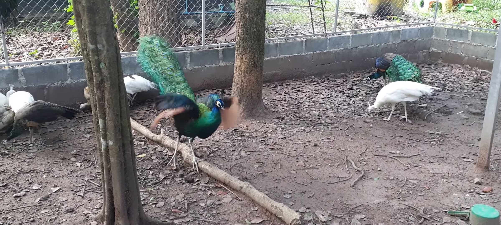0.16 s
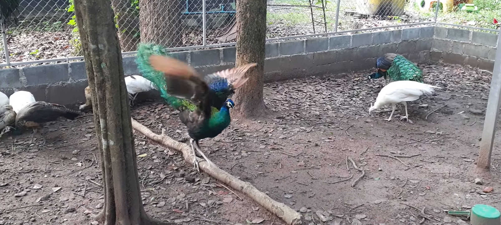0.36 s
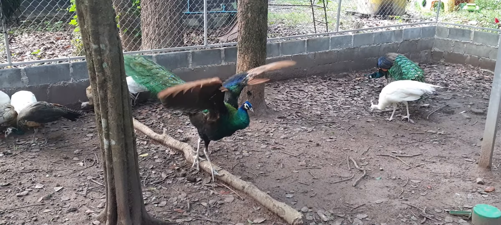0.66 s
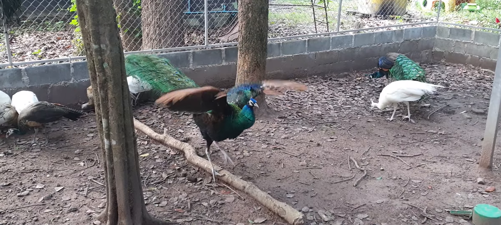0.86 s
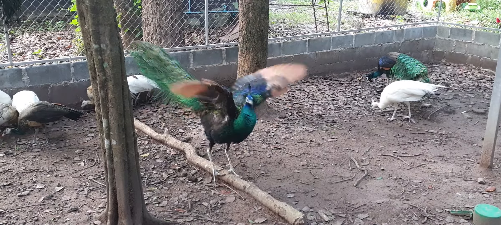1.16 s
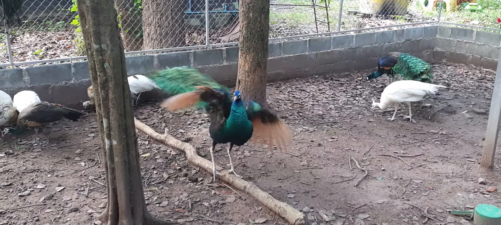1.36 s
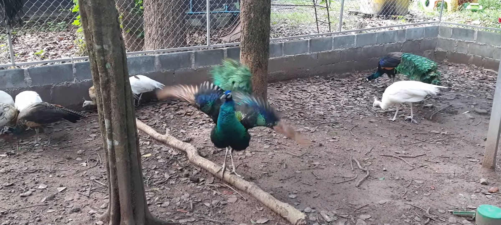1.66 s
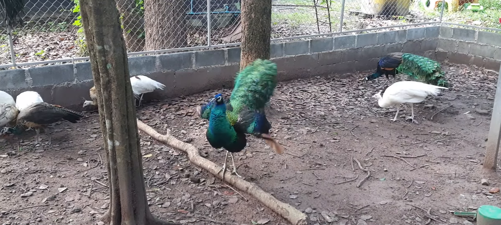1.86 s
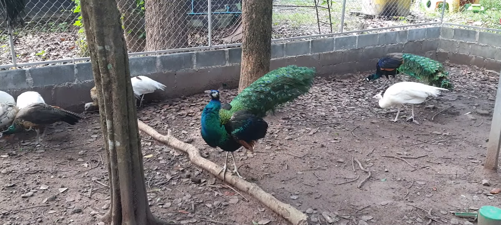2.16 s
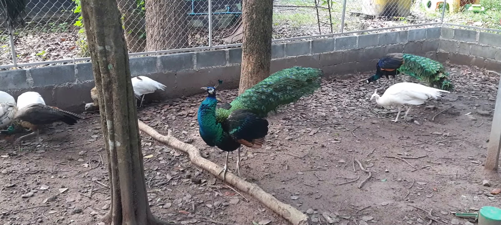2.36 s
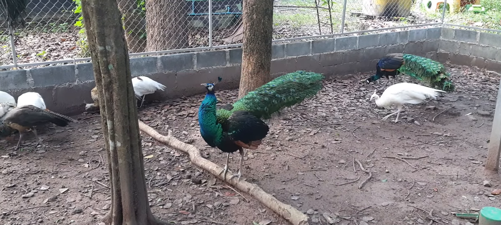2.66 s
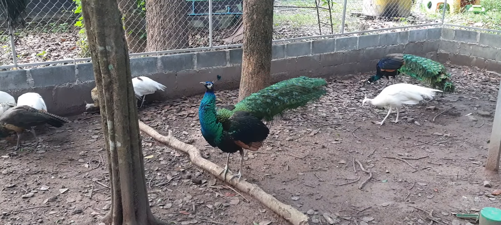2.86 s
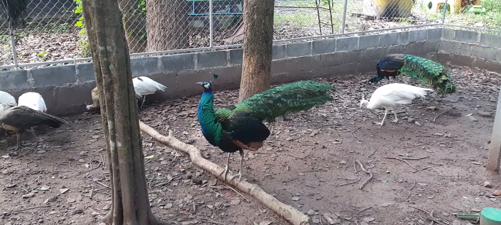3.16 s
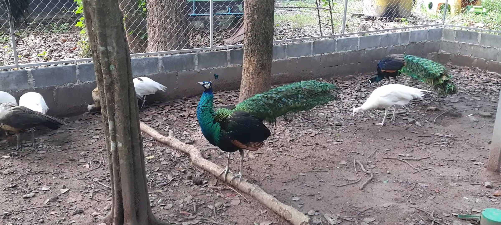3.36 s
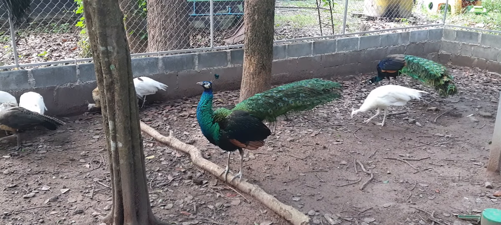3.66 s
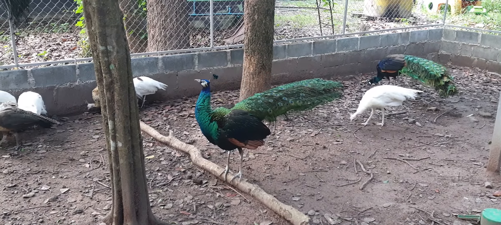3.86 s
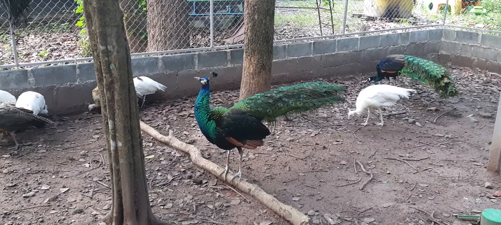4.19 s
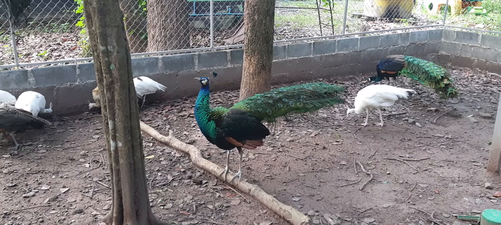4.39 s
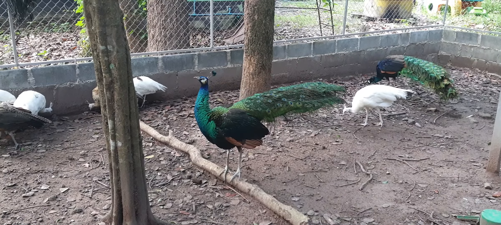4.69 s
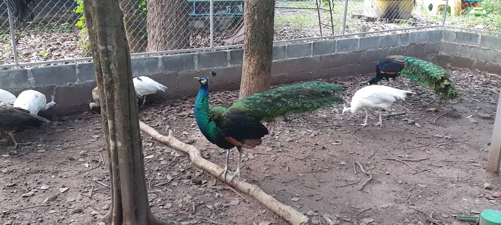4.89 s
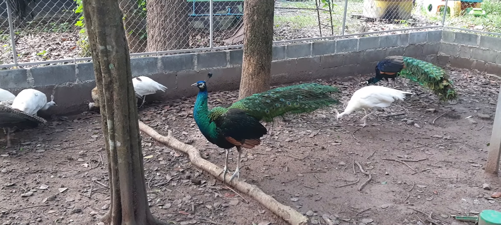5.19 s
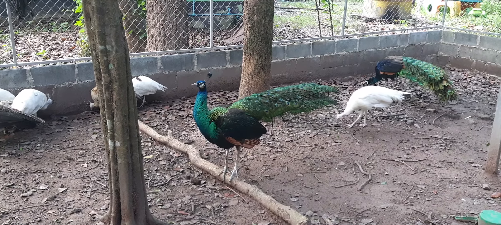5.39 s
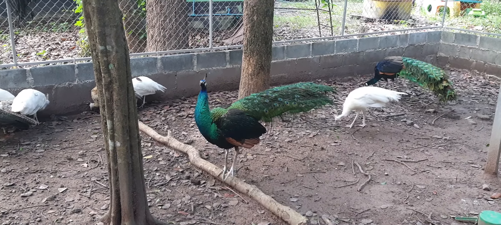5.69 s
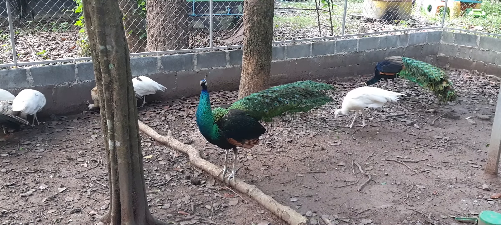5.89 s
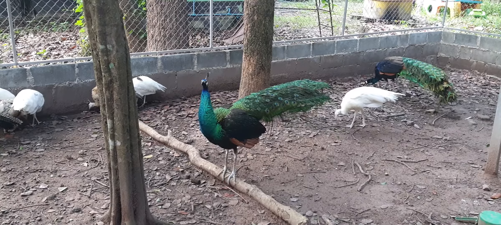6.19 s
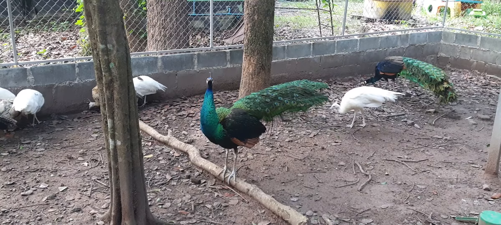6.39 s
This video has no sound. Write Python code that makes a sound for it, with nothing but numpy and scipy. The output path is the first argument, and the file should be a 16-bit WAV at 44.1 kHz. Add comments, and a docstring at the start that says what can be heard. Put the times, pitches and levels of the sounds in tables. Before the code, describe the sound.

An open-air walled pen with a short, scattered echo, heard in stereo with most birds to the right. A low engine drone near 80 Hz opens the scene with two wavering clucks; a tight cluster of sharp twig cracks comes at 0.15 s. Around 0.5 s a soft, low wing puff and dry feather rustle follow. The engine sags and stops abruptly at about 0.74 s, leaving a fainter, throbbing distant engine and traffic wash. A far, hoarse cock crow sinks from 0.8 to 2.5 s. Rustling continues until 1.9 s; a buzzy chirp comes at 1.4 s. Raspy small-bird calls recur near 0.3, 1.6, 2.8, 4.3 and 5.3 s, with clucks at 2.6-3.1 s and thin whistles at 1.1-1.7 and 3.6-5.3 s. Insects shrill steadily. Another buzzy chirp sounds at 5.2 s amid renewed rustling. At 5.8 s a peafowl calls loudly: one short rough syllable, then a longer, louder one from 6.16 s, turning hoarse until 6.6 s.

```python
"""A peacock flaps off a branch in a walled farm pen: twigs snap, feathers and dry leaves rustle. Two engines
drone far off; the nearer one soon stops short, then a far cock crows. Small birds chirp and whistle, fowl
cluck and insects shrill. At the end a peafowl gives a loud, hoarse call in two syllables.
Voices are pulses and breath through throat resonances, birds are trembling tones, engines are sines, and
snaps, rustle and air are filtered noise; the pen adds its echo to the nearby sounds."""
import sys
import numpy as np
from scipy import signal
from scipy.fft import rfft, irfft, next_fast_len
from scipy.io import wavfile

SR = 44100
rng = np.random.default_rng(int(sys.argv[2]) if len(sys.argv) > 2 else 0)


def unload_audio(sound):
    """Save the sound as a 16-bit wav file, at the path given as the first command line argument."""
    columns = np.transpose(np.atleast_2d(sound))
    # keep every value between -1 and 1, then stretch to whole-number steps
    steps = np.round(np.clip(columns, -1, 1) * 32767)
    wavfile.write(sys.argv[1], SR, steps.astype(np.int16))


N = 288414
TIME = np.arange(N) / SR  # seconds

# peafowl's throat in the short syllable, the long one and its hoarse end: [resonance_hz, width_hz, level_db]
THROAT_SHORT = [(638, 64, -7.5), (910, 55, -18.5), (1133, 114, -8), (1450, 265, -2.5), (1880, 110, -16),
                (2364, 150, -6.5), (2720, 340, -16.5), (3150, 160, -12.5), (4200, 230, -19),
                (5870, 1800, -25.5)]
THROAT_LONG = [(669, 30, 2), (800, 180, -7.5), (1070, 320, -7), (1470, 110, -16), (1655, 250, -0.5),
               (2064, 310, -4), (2767, 276, -6.5), (3640, 170, -19), (4560, 310, -16.5),
               (5800, 4400, -32.5)]
THROAT_HOARSE = [(681, 43, 4), (860, 160, -9), (1080, 250, -13), (1524, 270, -5), (1650, 210, -4),
                 (1980, 120, -5.5), (2200, 170, -10), (2850, 350, -7), (4600, 420, -17.5),
                 (6200, 5100, -35.5)]
# the farther engine's course of loudness, shared by its tones and its roar: [time_s, level_db]
FAR_LEVEL = [(0.85, -73), (1.48, -58.5), (1.51, -51.5), (2.47, -58.5), (2.64, -51), (3.45, -56),
             (3.48, -67), (3.63, -46.5), (3.68, -58), (4.63, -46), (6.26, -50.5), (6.5, -44)]
# sound from the birds' side of the pen reaches the second microphone port this much later
PORT_LAG_S = 0.00036


def amp(db):
    """Decibels to gain."""
    return 10 ** (np.asarray(db) / 20)


def unit(x):
    """Scales to rms 1."""
    return x / np.sqrt(np.mean(x ** 2) + 1e-20)


def read(points, hz):
    """Reads a spectrum on a log-frequency axis."""
    f, value = np.transpose(points)
    return np.interp(np.log(hz + 1), np.log(f + 1), value)


def track(rows):
    """Each column of a curve, sample by sample."""
    s, *columns = np.transpose(rows)
    return [np.interp(TIME, s, c) for c in columns]


def gate(start, end, fade=0.02):
    """One between two times, with soft edges."""
    return np.sqrt(np.clip(np.minimum(TIME - start, end - TIME) / fade, 0, 1))


def add(mix, s, sound):
    """Mixes a sound in at a time in seconds."""
    part = mix[max(round(s * SR), 0):][:len(sound)]
    part += sound[:len(part)]


def colour(x, gain):
    """Filters by a gain given as a function of frequency, then scales to rms 1."""
    size = next_fast_len(len(x))
    spectrum = rfft(x, size) * gain(np.fft.rfftfreq(size, 1 / SR))
    return unit(irfft(spectrum, size)[:len(x)])


def noise(points):
    """Noise of rms 1 with a given spectrum."""
    return colour(rng.standard_normal(N), lambda f: amp(read(points, f)))


def wander(rate, size=N):
    """Random drift of rms 1, mostly slower than a rate in Hz."""
    return colour(rng.standard_normal(size), lambda f: (f > 0) / (1 + (f / rate) ** 4))


def resonances(x, modes):
    """Steep resonances side by side, scaled to rms 1."""
    def gain(f):
        return sum(amp(db) / (1 + ((f - hz) / (width * 0.5)) ** 2) for hz, width, db in modes)
    return colour(x, gain)


def lean(x, right_db):
    """Louder in the right ear by this much."""
    sides = amp([[-right_db / 2], [right_db / 2]])
    return x * sides / sides.mean()


def place(x, wet_db, right_db, lag_s=0):
    """A source in the pen: direct sound, scattered echoes for each ear, and a lean to the right."""
    # the pen's echo, dying faster in the treble: [frequency_hz, t60_s]
    pen = [(200, 0.71), (800, 0.84), (2500, 0.61), (6000, 0.6), (14000, 0.43)]
    reflections = rng.standard_normal((2, SR)) * (rng.random((2, SR)) < 0.06)
    hz, t, z = signal.stft(reflections, SR, nperseg=256)
    decay = amp(-60 * t / read(pen, hz)[:, None])
    onset = 1 - np.exp(-t / 0.0019)
    tail = signal.istft(z * decay * onset, SR, nperseg=256)[1]
    tail /= np.linalg.norm(tail, axis=1, keepdims=True)
    echo = signal.fftconvolve(x[None], tail, axes=1)[:, :N]
    direct = np.array([x, np.pad(x, (round(lag_s * SR), 0))[:N]])
    return lean((direct + amp(wet_db) * echo) / np.hypot(1, amp(wet_db)), right_db)


def syrinx(hz, jitter, flutter_hz, flutter):
    """Jittered pulses, shaken by a second membrane, and a puff of air in every cycle."""
    turns = np.cumsum(hz * (1 + jitter * wander(120))) / SR
    pulses = sum(np.cos(2 * np.pi * k * turns) for k in range(1, 10))
    shake_hz = flutter_hz * (1 + 0.1226 * wander(46.2))
    shake = 1 + flutter * np.cos(2 * np.pi * np.cumsum(shake_hz) / SR)
    puffs = (1.3 + np.exp(-(turns % 1) / 0.18)) * rng.standard_normal(N)
    return unit(pulses * shake), unit(puffs * shake)


def voice(source, throat, window, rough):
    """The clear and the hoarse part of one syllable pass the same throat."""
    loudness = np.sqrt(np.mean(window ** 2))
    clear, hoarse = (resonances(part * window, throat) * loudness for part in source)
    rough = np.clip(rough, 0, 1)
    return np.sqrt(1 - rough) * clear + np.sqrt(rough) * hoarse


def notes(rows, waver_db):
    """Each note is one gliding tone with a faint octave, spread into a buzz by fast random trembling."""
    # rows: start_s, length_s, first_hz, middle_hz, last_hz, level_db, spread_hz (twice the rms tremble)
    out = np.zeros(N)
    for s, length, first, middle, last, db, spread in rows:
        u = np.linspace(0, 1, int(length * SR))
        glide = np.polyval(np.polyfit([0, 0.5, 1], [first, middle, last], 2), u)
        tremble = spread / 2 * wander(spread / 2 + 30, size=len(u))
        angle = 2 * np.pi * np.cumsum(glide + tremble) / SR
        swell = amp(waver_db * wander(45, size=len(u))) * signal.windows.tukey(len(u), 0.4)
        tone = np.sin(angle) + amp(-38) * np.sin(2 * angle)
        add(out, s, amp(db) * unit(tone * swell))
    return out


def peafowl():
    """The loud call: the throat changes shape with each syllable, and the pitch shakes more where it is hoarse."""
    # parts of the call: [start_s, length_s, level_db, pitch_hz, roughness_0_to_1, fade_db_per_s, throat]
    syllables = [(5.828, .24, -40.5, 756, 0.74, 12, THROAT_SHORT),
                 (6.159, .27, -32.5, 885, 0.3, 43, THROAT_LONG),
                 (6.35, .27, -34, 863.2, 0.6, 8.5, THROAT_HOARSE)]
    attack_s, release_s = 0.056, 0.098
    scoop_share, scoop_s, sag_hz_per_s = 0.1, 0.02, 90  # pitch scoops up to the note, then sags
    jitter_at_full_roughness = 0.06  # share of the pitch
    call = np.zeros(N)
    for start, length, db, pitch, rough, fade, throat in syllables:
        t = np.clip(TIME - start, 0, length)
        hz = pitch * (1 - scoop_share * np.exp(-t / scoop_s)) - sag_hz_per_s * t
        swell = np.clip(np.minimum((t / attack_s) ** 2, (length - t) / release_s), 0, 1)
        source = syrinx(hz, jitter=rough * jitter_at_full_roughness, flutter_hz=190.2, flutter=0.48)
        # half of the swell acts before the throat, half after it
        syllable = voice(source, throat, np.sqrt(swell), rough) * np.sqrt(swell)
        call += syllable * amp(db - fade * t)
    return place(call, wet_db=3.5, right_db=8.0, lag_s=PORT_LAG_S)


def snaps():
    """Twigs, claws and quills crack: short bursts of noise in the pen; the longer ones also start more softly."""
    # cracks: [start_s, level_db, decay_s, brightness_db_per_octave]
    cracks = [(0.1426, -41.5, 0.00082, -1.5), (.1452, -29, 0.00076, 4.5), (.1484, -35.5, 0.00064, 0.5),
              (.157, -45.5, 0.0043, 5), (0.965, -53.5, 0.0022, 5), (1.115, -59, 0.015, 2.5),
              (3.06, -64, 0.031, 0.5), (4.808, -53, 0.014, -0.5), (5.495, -65, 0.015, 1)]
    # colour of a crack before its brightness tilt: [frequency_hz, level_db]
    crack_colour = [(200, -7), (1000, -9.5), (1800, -11), (2800, 1), (3800, -12), (5000, -5), (7400, -5),
                    (11000, -14.5), (13000, -6.5), (16000, -17.5)]
    out, t = np.zeros(N), np.arange(8192) / SR
    for s, db, decay, tilt in cracks:
        def gain(f):
            return amp(read(crack_colour, f) + tilt * np.log2((f + 200) / 6000))
        burst = colour(rng.standard_normal(len(t)), gain)
        add(out, s, amp(db) * burst * t / decay * np.exp(1 - t / decay))
    return place(out, wet_db=0.0, right_db=7.0)


def rustle():
    """Feathers brushing and leaves crackling: a hiss with sparse grains in it, stroke by stroke."""
    # strokes of wings and feet through feathers and leaves: [peak_s, length_s, level_db]
    stroke_rows = [(0.467, 0.25, -61), (.61, 0.12, -60.5), (1.172, 0.085, -63), (1.353, 0.75, -61.5),
                   (1.607, 0.22, -58), (1.776, 0.34, -65), (3.995, .2, -70), (5.206, 0.21, -60),
                   (5.94, 0.26, -59), (6.22, 0.26, -62), (6.506, 0.23, -58)]
    # colour of feathers and leaves: [frequency_hz, level_db]
    leaf_colour = [(100, -4), (400, -2.5), (1500, -0.5), (3700, -1), (5000, 2), (7000, 0.5), (10500, -8.5),
                   (13000, -0.5), (16000, -7.5)]
    rise = 0.48  # share of a stroke spent swelling
    stir_db = -87  # faint stir of leaves under the strokes
    hits = rng.random(N) < 500 / SR  # about 500 grains a second
    grain_db = 2.4 * np.minimum(rng.exponential(1, N), 4)
    grains = hits * rng.standard_normal(N) * amp(grain_db)
    hiss = amp(1.0) * rng.standard_normal(N)
    brush = colour(unit(grains) + hiss, lambda f: amp(read(leaf_colour, f)))
    strokes = sum(amp(db) * np.interp(TIME - s, [-rise * length, 0, (1 - rise) * length], [0, 1, 0])
                  for s, length, db in stroke_rows)
    return place(brush * (strokes + amp(stir_db)), wet_db=12.5, right_db=5.0)


def wings():
    """Wing strokes push air: each is a soft, low puff of noise."""
    # strokes: [start_s, length_s, level_db]
    wingbeats = [(0.469, 0.11, -59), (1.443, 0.14, -72)]
    # colour of the pushed air: [frequency_hz, level_db]
    wing_colour = [(60, -6), (150, -14), (300, 10), (500, -16), (1500, -18), (6000, -35)]
    push = np.zeros(N)
    for s, length, db in wingbeats:
        add(push, s, amp(db) * np.hanning(int(length * SR)))
    return place(push * noise(wing_colour), wet_db=-6.5, right_db=4)


def tsits():
    """A nearer small bird repeats the same short call: a falling rasp and then a chip."""
    # rasp and chip: [start_s, length_s, first_hz, middle_hz, last_hz, relative_level_db, spread_hz]
    tsit = [(0, .1, 5280, 4820, 4348, -3, 1080), (.075, .028, 3614, 3267, 3580, -2, 220)]
    # each time it is given: [start_s, level_db]
    calls = [(0.343, -56), (1.585, -58.5), (2.81, -59), (4.345, -59), (5.319, -57)]
    out = np.zeros(N)
    for s, db in calls:
        add(out, s, amp(db) * notes(tsit, waver_db=1))
    return place(out, wet_db=1, right_db=5.5)


def chirps():
    """Long buzzy chirps: each arches in pitch and has a second, lower voice."""
    # chirps: [start_s, length_s, peak_pitch_hz, level_db]
    chirp_rows = [(1.426, 0.14, 6520, -55.5), (5.171, 0.15, 6865, -52.5)]
    arch, buzz = 0.055, 0.104  # shares of the pitch
    low_ratio, low_db = 0.755, -5.5  # the lower voice against the upper
    rows = [(s, length, hz * (1 - arch), hz, hz * (1 - arch), level, hz * buzz)
            for s, length, pitch, db in chirp_rows
            for hz, level in [(pitch, db), (pitch * low_ratio, db + low_db)]]
    return place(notes(rows, waver_db=2), wet_db=5.5, right_db=7.5)


def clucks():
    """Low, wavering clucks of the other fowl: a tone and its undertone, drooping at the end."""
    # clucks: [start_s, length_s, pitch_hz, level_db]
    cluck_rows = [(0, 0.095, 1085, -59), (.13, 0.12, 1073, -61.5), (2.627, .11, 1121, -58),
                  (2.768, 0.062, 1037, -64.5), (2.865, 0.0546, 1060, -60), (2.997, 0.11, 1093, -60.5)]
    droop, spread_hz = 0.05, 40  # droop as a share of the pitch
    low_ratio, low_db = 0.82, -6  # the undertone against the tone
    rows = [(s, length, hz, hz, hz * (1 - droop), level, spread_hz)
            for s, length, pitch, db in cluck_rows
            for hz, level in [(pitch, db), (pitch * low_ratio, db + low_db)]]
    return place(notes(rows, waver_db=4), wet_db=-3.5, right_db=7.5, lag_s=PORT_LAG_S)


def whistles():
    """A bird in the trees: each whistle glides quickly at first, then settles towards its last pitch."""
    # whistles: [start_s, length_s, first_hz, last_hz, level_db, spread_hz]
    whistle_rows = [(1.139, .19, 2460, 2600, -68, 174), (1.291, .046, 1995, 1730, -64, 60),
                    (1.38, 0.28, 2450, 1877, -63, 45), (3.559, 0.4, 2745, 3007, -71, 66),
                    (3.893, 0.058, 3350, 2084, -67, 384), (3.997, 0.044, 2040, 3190, -67.5, 380),
                    (4.097, 0.2, 2350, 1935, -68.5, 137), (4.379, 0.077, 1970, 2130, -67, 221),
                    (4.705, 0.15, 2510, 2310, -67.5, 245), (4.957, .12, 821, 720, -74.5, 50.3),
                    (4.98, 0.31, 2235, 2190, -71, 260)]
    settle = 0.9  # share of the glide made by half time
    rows = [(s, length, first, first + settle * (last - first), last, db, spread)
            for s, length, first, last, db, spread in whistle_rows]
    return place(notes(rows, waver_db=4), wet_db=0, right_db=13.0, lag_s=PORT_LAG_S)


def birds():
    """Tsits, chirps, clucks and whistles, each from its own place."""
    return tsits() + chirps() + clucks() + whistles()


def cock():
    """A far cock's long, hoarse crow sinks and fades, more echo than direct, with chest only in its middle."""
    # throat, chest resonance first: [resonance_hz, width_hz, level_db]
    crow_throat = [(654, 210, 5.5), (1490, 750, -14.5), (1940, 41, -13)]
    start_s, end_s = 0.778, 2.56
    chest_start_s, chest_end_s = 0.903, 1.68
    start_hz, rest_hz, sink_s = 852, 724, 0.5
    level_db, fade_db_per_s = -66, 0.5
    t = np.maximum(TIME - start_s, 0)
    hz = rest_hz + (start_hz - rest_hz) * np.exp(-t / sink_s)
    source = syrinx(hz, jitter=0.025, flutter_hz=110.5, flutter=0.084)
    upper = voice(source, crow_throat[1:], gate(start_s, end_s), rough=0.58)
    chest = voice(source, crow_throat[:1], gate(chest_start_s, chest_end_s), rough=0.53)
    crow = (amp(-4.5) * upper + amp(-4) * chest) * amp(level_db - fade_db_per_s * t)
    return place(crow, wet_db=4, right_db=8.5)


def far_birds(count=130):
    """Faint random twitter from trees far to the right: short, mostly falling notes."""
    when, pitch, length, bend, fall, loud = rng.random((count, 6)).T
    start_s, length_s = when * TIME[-1], 0.04 + 0.12 * length
    hz = 1300 * 2.5 ** pitch
    middle_hz, last_hz = hz * (0.92 + 0.14 * bend), hz * (0.82 + 0.248 * fall)
    level_db = -85 + 6 * loud
    rows = np.transpose([start_s, length_s, hz, middle_hz, last_hz, level_db, 0.065 * hz])
    return place(notes(rows, waver_db=1.5), wet_db=9.5, right_db=29.5)


def near_running():
    """Firing rate and level of the nearer engine: it slows ever faster, then dies."""
    start_hz, sag_hz = 80.8, 5.4
    level_db, stop_s, die_db_per_s = -45, 0.737, 338
    hz = start_hz - sag_hz * np.minimum(TIME / stop_s, 1) ** 2
    return hz, level_db - die_db_per_s * np.clip(TIME - stop_s, 0, 1)


def near_engine():
    """Low exhaust tones at multiples of the firing rate, unsteady in level, until the engine stops short."""
    # exhaust orders: [multiple_of_firing_rate, relative_level_db]
    orders = [(.5, -18), (1, 2), (1.5, -37), (1.65, -16.5)]
    hz, db = near_running()
    angle = 2 * np.pi * np.cumsum(hz) / SR
    tones = sum(amp(level) * np.sin(k * angle) for k, level in orders)
    return lean(tones * amp(db + 1.5 * wander(23)), right_db=0.0)


def far_engine():
    """A firing tone and a beat at 1.5 times its rate; the beat throbs slowly and strongly."""
    # speed: [time_s, firing_rate_hz]
    speed = [(1.3, 58.5), (2.83, 59.5), (3.13, 60.5), (3.74, 61), (3.8, 60.5), (4.79, 59.5), (6.4, 58.5)]
    throb_period_s, throb_peak_s = 0.38, 1.55
    # level against the engine's curve, and depth of the throb
    firing_db, firing_throb_db = -2.5, -0.5
    beat_db, beat_throb_db = -5, 3
    angle = 2 * np.pi * np.cumsum(track(speed)[0]) / SR
    throb = np.cos(2 * np.pi * (TIME - throb_peak_s) / throb_period_s)
    firing = amp(firing_db + firing_throb_db * throb) * np.sin(angle)
    beat = amp(beat_db + beat_throb_db * throb) * np.sin(1.5 * angle + 0.5 * wander(2.0))
    return lean(amp(track(FAR_LEVEL)[0]) * (firing + beat), right_db=9)


def roar():
    """Strength of the low wash: a steady part plus what each engine adds."""
    steady = amp(-63)
    near = amp(near_running()[1] - 7)
    far = amp(track(FAR_LEVEL)[0] - 9.5)
    return np.sqrt(steady ** 2 + near ** 2 + far ** 2)


def machine_hum():
    """Hum at fixed pitches, wavering in level and phase; it swells and fades with the engines' roar."""
    # tones before they follow the roar: [frequency_hz, level_db]
    hum_tones = [(113, -68), (134, -67.5), (157, -71.5)]
    follow = 0.71  # share, in decibels, of the roar's rise and fall
    hum = sum(amp(level + 2.1 * wander(5.2)) * np.sin(2 * np.pi * f * TIME + 0.83 * wander(0.74))
              for f, level in hum_tones)
    return lean(hum * unit(roar()) ** follow, right_db=7)


def engines():
    """Only low tones carry this far; the root of two makes a sine's level its rms."""
    return np.sqrt(2) * (near_engine() + far_engine() + machine_hum())


def insects():
    """A steady shrill of many insects, and one cricket chirping at an uneven pace: narrow bands of noise."""
    # shrill bands: [frequency_hz, width_hz, level_db]
    shrill_bands = [(4504, 620, -71), (5945, 820, -70.5), (3030, 630, -78)]
    # the cricket: frequency_hz, width_hz, level_db
    cricket_band = (4900, 190, -72)
    steady = np.array([sum(resonances(rng.standard_normal(N), [(hz, width, 0)]) * amp(db + 0.88 * wander(6.9))
                           for hz, width, db in shrill_bands) for ear in range(2)])
    hz, width, db = cricket_band
    pulse = 0.5 + 0.5 * np.cos(2 * np.pi * 4.6 * TIME + wander(1.5))  # about 4.6 chirps a second
    cricket = resonances(rng.standard_normal(N), [(hz, width, 0)]) * unit(pulse) * amp(db)
    return lean(steady, right_db=5) + place(cricket, wet_db=-6, right_db=5)


def outdoors():
    """Traffic wash, mostly alike in both ears, that rises and falls with the engines, and soft air."""
    # colour of the traffic wash: [frequency_hz, level_db]
    traffic_colour = [(15, -48), (30, -1.5), (45, 10), (90, 18.5), (130, 12), (190, -4.5), (290, -1.5),
                      (450, -14), (900, -34), (2500, -27)]
    # colour of the air: [frequency_hz, level_db]
    air_colour = [(30, -8), (500, 9), (1000, 4), (2000, -7), (3000, 2.5), (3700, -15.5), (4400, -3),
                  (6000, -5), (8000, 0), (11000, -17), (16000, -3)]
    shared = noise(traffic_colour)
    wash = np.array([shared + amp(-11.5) * noise(traffic_colour) for ear in range(2)])
    air = np.array([noise(air_colour) for ear in range(2)]) * amp(-73)
    return lean(wash * roar(), right_db=6.0) + lean(air, right_db=3.5)


def scene():
    """Everything in and around the pen."""
    pen = peafowl() + snaps() + rustle() + wings() + birds()
    distance = cock() + far_birds() + engines() + insects() + outdoors()
    return pen + distance


def record(dry):
    """The recorder's band limit: a steep low-pass filter."""
    edge_hz = 15850
    low_pass = signal.firwin(511, edge_hz, window=("kaiser", 9), fs=SR)
    return signal.oaconvolve(dry, low_pass[None], "same")


dry = scene()
out = record(dry)
unload_audio(out)
```